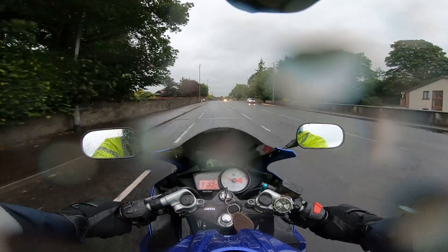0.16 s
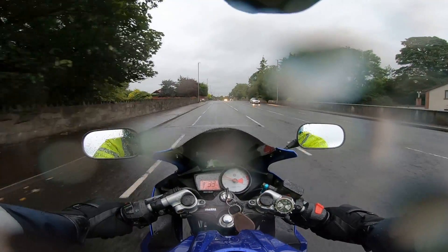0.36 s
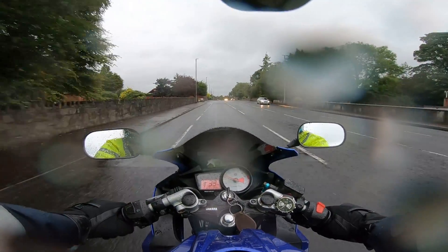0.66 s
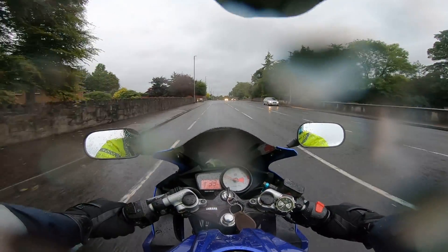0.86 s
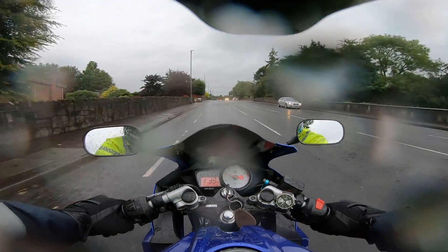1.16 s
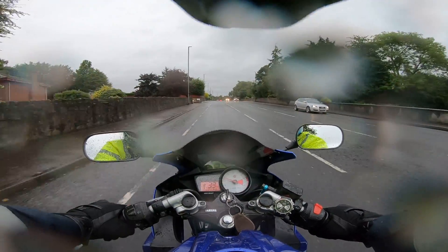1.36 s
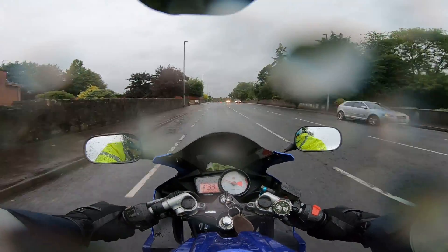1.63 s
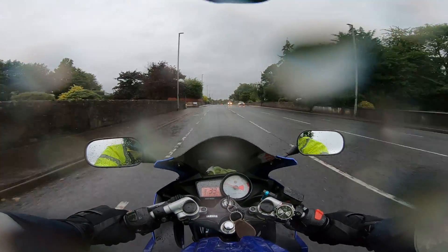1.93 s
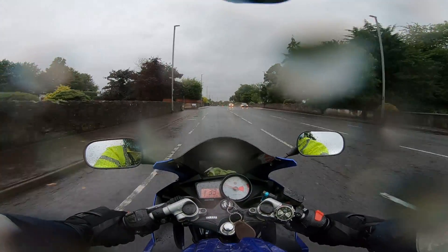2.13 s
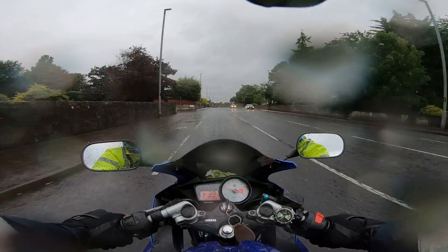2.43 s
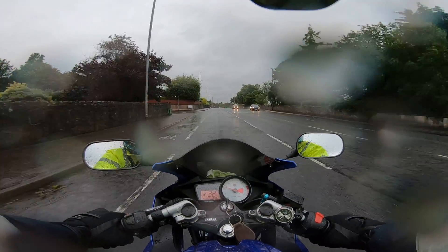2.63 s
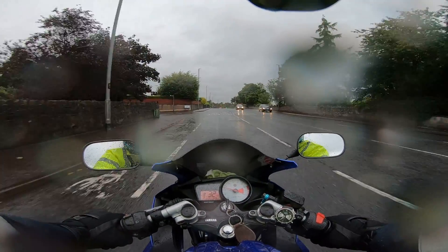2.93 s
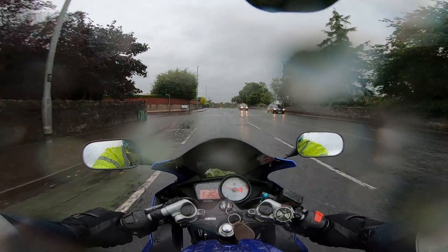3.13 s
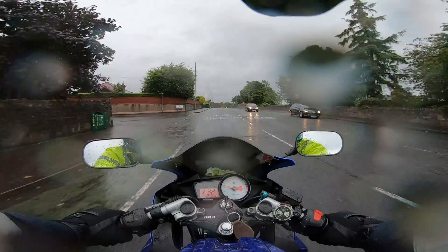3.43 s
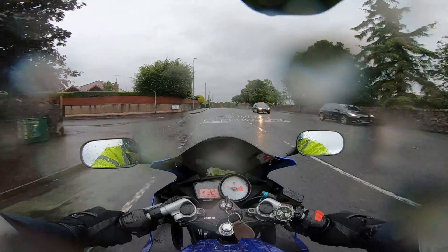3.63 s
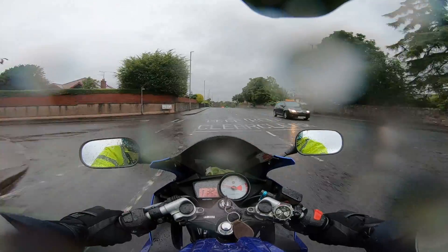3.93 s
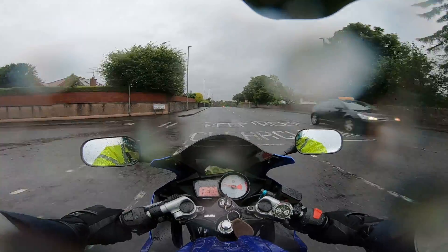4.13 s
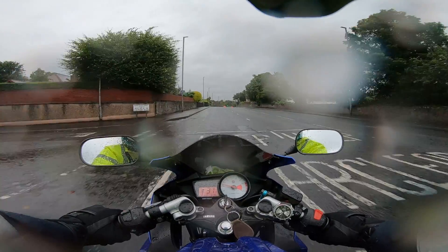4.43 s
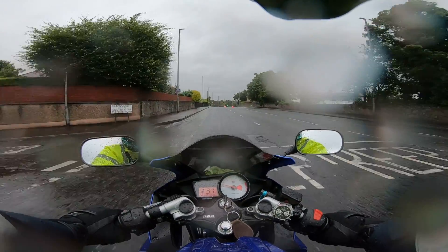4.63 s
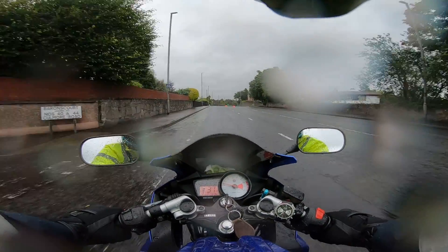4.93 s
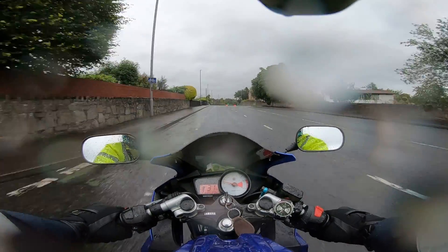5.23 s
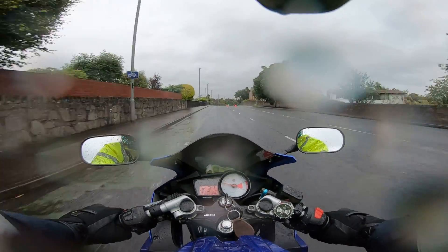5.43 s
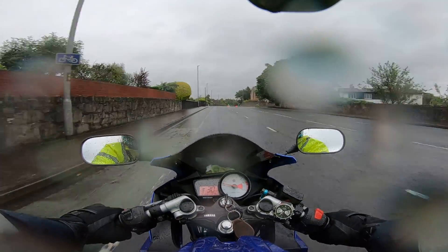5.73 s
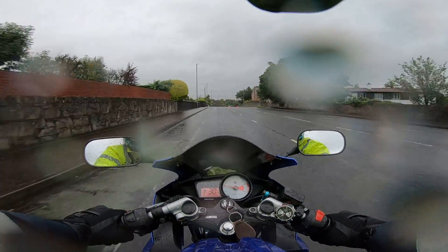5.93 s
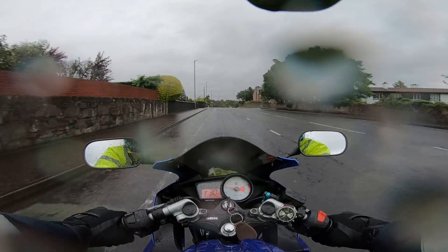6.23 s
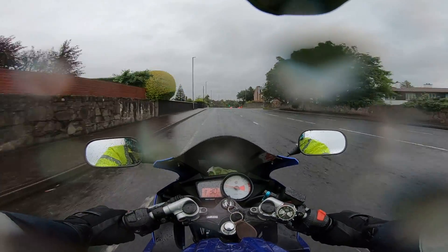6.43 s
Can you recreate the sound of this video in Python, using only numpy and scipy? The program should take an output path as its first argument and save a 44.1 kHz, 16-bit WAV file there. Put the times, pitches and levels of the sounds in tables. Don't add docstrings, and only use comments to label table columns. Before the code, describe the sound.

From the rider's position, buffeting wind nearly buries a steady low engine drone, wet tyre spray, passing car swishes and tiny rain ticks.

```python
import sys
import numpy as np
from scipy import signal
from scipy.fft import rfft, irfft, next_fast_len
from scipy.io import wavfile
from scipy.ndimage import uniform_filter1d, map_coordinates

SR = 44100
rng = np.random.default_rng(int(sys.argv[2]) if len(sys.argv) > 2 else 0)


def undo_db(level):
    steps = np.asarray(level, float) / 20
    return 10 ** steps


def put_to_file(sound):
    columns = np.atleast_2d(sound).T
    safe = np.clip(columns, -1, 1)
    whole_steps = np.round(safe * 32767)
    wavfile.write(sys.argv[1], SR, whole_steps.astype(np.int16))


N = 290178

# [start t/s, length t/s, buffet level/dB, sharp edge over buffet level/dB]
GUSTS = [(0, 0.31, -14, -11.5), (0.289, 0.058, -23, -12), (0.352, 0.12, -17.5, -9),
         (0.465, 0.37, -13.5, -4.5), (0.948, 0.152, -14.5, -2), (1.14, 0.042, -19, -7),
         (1.358, 0.056, -14, -7), (1.465, 0.14, -11.5, -10), (2.071, 0.021, -12.5, 3),
         (2.14, 0.081, -12.5, -13), (2.255, 0.2, -17.5, -5), (2.495, 0.081, -17, -6),
         (2.623, 0.045, -15.5, -19), (2.726, 0.18, -15, -9), (2.98, 0.061, -17.5, -10),
         (3.075, 0.16, -14.5, -4), (3.23, 0.06, -17.5, -6), (3.34, 0.061, -16.5, -20),
         (3.439, 0.072, -16, -6), (3.686, 0.33, -22, -5.5), (3.877, 0.2, -15.5, -3), (4.15, 0.28, -16, -4),
         (4.593, 0.09, -13.5, -16), (4.729, 0.14, -16, -9), (4.938, 0.29, -15, -6.5),
         (5.228, 0.27, -17, -5), (5.505, 0.26, -16, -7.5), (5.735, 0.1385, -17, -3),
         (5.838, 0.4, -19, -8.5), (6.177, 0.58, -24, -3)]
# [f/Hz, level/dB per Hz]
THUMP_COLOUR = [(20, -41.5), (45, -17), (65, 3), (90, 0.5), (130, 3.5), (200, -5.5), (330, -13), (600, -22),
                (1500, -61.5)]
EDGE_COLOUR = [(150, -8.5), (330, 2.5), (600, -6), (1000, -9.5), (2000, -22.5), (5000, -40)]
HEAVE_COLOUR = [(16, -35.5), (27, -8.5), (40, -12.5), (55, -11), (85, -17)]
# [t/s, f/Hz]
CRANK_CYCLE = [
    (0, 37.6),
    (1.9, 37.35),
    (2.7, 36.6),
    (3.5, 35.9),
    (4.7, 35.1),
    (5.5, 34.65),
    (6.58, 34.3),
]
# [multiple of the crank cycle, coasting level/dB rms, pulling level/dB rms]
EXHAUST_ORDERS = [(2, -26, -28.5), (3, -34, -34), (4, -41, -25), (5, -31, -30.5), (6, -42, -31),
                  (7, -44, -30), (8, -49, -44), (10, -40, -43.5), (13, -54.5, -36)]
# [t/s, opening 0-1]
THROTTLE = [
    (0, 0.4),
    (1.3, 0.25),
    (1.8, 0),
    (2.9, 0.3),
    (3.6, 0.14),
    (4.6, 0.15),
    (5.4, 0.53),
    (5.9, 0.7),
    (6.3, 0.93),
    (6.58, 0.88),
]
# [t/s, roar level/dB]
WETNESS = [(0.0, -27.5), (0.16, -34.5), (0.42, -31.5), (0.58, -28), (1.32, -35), (2.0, -31), (2.99, -28.5),
           (3.1, -27), (4.25, -27), (4.8, -29), (5.0, -28.5), (5.1, -26), (5.42, -30.5), (5.54, -31.5),
           (6.12, -29), (6.58, -25)]
# [closest t/s, spray level/dB, gap over closing speed t/s]
CARS = [
    (1.9, -36, 0.22),
    (3.62, -35.5, 0.16),
    (3.88, -34, 0.25),
    (4.3, -40.5, 0.23),
    (5.85, -42, 0.15),
    (6.45, -36, 0.2),
]
# [f/Hz, level/dB per Hz]
ROAR_COLOUR = [(30, -24), (100, 8.5), (300, 3), (550, -1.5), (800, 3), (1150, 2.5), (1400, -2),
               (1700, -29.5), (2500, -47)]
SPRAY_COLOUR = [(820, -39), (1400, 0), (1450, 1.5), (1620, 2), (2000, 1), (2180, 1.5), (3430, -6.5),
                (3860, -18), (4600, -16), (6200, -23.5), (8060, -51), (13600, -120)]
MIST_COLOUR = [(4300, -33), (5000, -5), (5240, 3), (5500, -5.5), (6600, -7.5), (8200, -6.5), (8900, -20),
               (9800, -22), (10400, -22), (11200, -28), (12500, -36), (13700, -40), (14000, -73.5),
               (16000, -73.5)]
# [t/s, peak level/dB]
SLAPS = [(0.02, -11), (0.195, -16.5), (0.242, -19.5), (0.385, -14), (0.406, -18.5), (0.463, -9.5),
         (0.485, -14), (0.579, -9), (0.62, -12.5), (0.64, -10), (0.666, -10), (0.695, -6.5), (0.772, -20),
         (0.966, -8), (1.008, -9), (1.05, -9.5), (1.081, -9), (1.525, -7), (1.54, -6), (2.074, -14),
         (2.141, -10), (2.178, -12.5), (2.257, -10), (2.499, -8), (2.744, -15), (2.816, -20.5),
         (3.069, -13), (3.094, -17), (3.13, -15.5), (3.297, -17.5), (3.506, -15.5), (4.626, -18),
         (4.756, -11.5), (5.038, -6), (5.185, -14), (5.591, -13.5), (5.661, -19), (5.782, -13.5),
         (5.996, -20), (3.356, -14), (3.389, -13.5), (3.756, -14), (3.822, -17), (3.999, -9), (4.046, -9),
         (4.163, -14), (4.82, -11), (4.965, -20), (5.012, -5.5), (5.158, -12), (5.351, -10), (5.392, -9),
         (5.457, -12), (6.341, -12.5), (6.545, -11.5)]
# [f/Hz, level/dB per Hz]
CRACKLE_COLOUR = [(200, -40), (450, -3), (900, -5), (1400, -15), (2300, -22), (5000, -49)]
# [middle t/s, peak level/dB, f/Hz]
SWELLS = [(0.024, -14, 78), (0.114, -12, 89), (0.241, -13.5, 83), (0.295, -7.5, 80), (0.426, -10, 89),
          (0.494, -7.5, 78), (0.593, -10.2, 84), (0.645, -12.2, 92), (0.699, -10, 87), (0.773, -7, 79),
          (0.844, -6.5, 81), (1.013, -7.5, 73), (1.091, -7, 98), (1.522, -13, 79), (1.592, -11, 80),
          (2.083, -9, 93), (2.146, -6, 83.5), (2.19, -7, 84), (2.268, -7.5, 89.5), (2.363, -10.5, 88),
          (2.428, -12.8, 85), (2.57, -8.5, 68), (2.639, -18, 93), (2.819, -17, 81), (2.887, -10, 92),
          (3.02, -13, 81), (3.104, -9, 87), (3.157, -12, 82), (3.203, -12.0, 71), (3.242, -21, 76),
          (3.297, -10, 88), (3.363, -12.5, 80), (3.465, -12.4, 87), (3.76, -12, 82), (3.797, -11.5, 77),
          (3.836, -13.4, 78), (3.976, -10, 80), (4.028, -11.4, 86), (4.215, -11, 95), (4.288, -8, 65),
          (4.393, -8.5, 80), (4.67, -15, 77), (4.763, -8.5, 92), (4.859, -9.5, 80), (4.971, -12, 84),
          (5.043, -5, 81), (5.097, -13, 90), (5.155, -8.5, 79), (5.196, -7, 82), (5.252, -6.5, 79),
          (5.342, -5.5, 96), (5.506, -16, 79.2), (5.559, -8, 72), (5.598, -7, 77), (5.689, -12, 72),
          (5.728, -9, 79), (6.332, -10, 89), (6.455, -11.7, 74)]
# [middle t/s, peak level/dB, f/Hz]
RIPPLES = [(0.037, -6, 164), (0.075, -11, 182), (0.127, -14, 191), (0.169, -11.6, 177), (0.202, -8.6, 177),
           (0.246, -10.0, 178), (0.487, -12, 213), (0.536, -7.3, 169), (0.584, -13.0, 226),
           (0.641, -10, 189), (0.703, -13.6, 225), (0.835, -13, 198), (0.943, -10.5, 192),
           (0.979, -9.0, 193), (1.049, -11.4, 216), (1.094, -9.8, 192), (1.165, -9.6, 173),
           (1.496, -10, 171), (1.53, -13, 164), (1.579, -12.7, 187), (2.091, -9.2, 211),
           (2.165, -10.4, 167), (2.224, -10, 166), (2.359, -12.9, 183), (2.549, -9, 172),
           (2.647, -11.9, 182), (2.74, -13, 168), (2.774, -11.9, 157), (2.867, -13.6, 197),
           (3.075, -13.4, 188), (3.14, -12.3, 178), (3.244, -11.2, 187), (3.392, -14, 179),
           (3.829, -12, 177), (3.913, -12.3, 202), (3.957, -8, 164), (4.0, -10.7, 177), (4.185, -14.5, 176),
           (4.355, -11.9, 172), (4.616, -13, 183), (4.675, -10.7, 205), (4.755, -14, 177),
           (4.819, -9.5, 171), (5.016, -11.7, 199), (5.052, -10.5, 185), (5.127, -8.7, 188),
           (5.267, -13.5, 179), (5.517, -8.5, 175), (5.66, -13, 199), (5.794, -9.6, 209), (5.847, -12, 185),
           (5.878, -12, 174), (6.027, -15, 198), (6.231, -23, 185), (6.29, -14, 172), (6.348, -10.5, 178),
           (6.435, -11, 180), (6.522, -15, 186)]
# [t/s, peak level/dB, f/Hz, push +1 or suck -1]
JOLTS = [(0.0444, -13, 210, 1), (0.2018, -4, 260, 1), (0.2477, -3, 210, -1), (0.4102, -2, 386, 1),
         (0.5352, -1.5, 180, 1), (0.583, -3, 300, -1), (0.6391, -7, 210, 1), (0.7018, -7, 180, -1),
         (0.7332, -4, 312, 1), (0.7797, -7, 340, -1), (0.979, -3, 283, -1), (1.0264, -4, 210, 1),
         (1.0487, -3.5, 280, -1), (1.067, -5.5, 450, 1), (1.0927, -1.5, 212, 1), (1.166, -4.5, 176, 1),
         (1.542, -12, 279, -1), (1.578, -8, 320, -1), (2.091, 1, 236, 1), (2.152, -5, 230, 1),
         (2.1653, -1.5, 180, 1), (2.181, -2.5, 457, 1), (2.36, -10.5, 190, -1), (2.535, -4.5, 225, 1),
         (2.646, -2.5, 173, -1), (2.7744, -2, 152, 1), (2.8684, -5, 230, 1), (3.137, -4, 240, 1),
         (3.246, -6.5, 235, -1), (3.2994, -9, 229, 1), (3.3905, -8, 500, -1), (3.4644, -7, 180, -1),
         (3.51, -3.5, 280, -1), (3.7581, -4.5, 466, -1), (3.9102, -7, 284, -1), (3.935, -6, 230, 1),
         (3.9793, -6, 220, -1), (4.0017, -5, 380, -1), (4.0199, -8.8, 330, 1), (4.2624, -5, 252, 1),
         (4.3536, -9, 220, 1), (4.676, -3, 220, -1), (4.968, -8, 310, 1), (5.014, -8, 550, 1),
         (5.0537, -7, 260, 1), (5.1262, -5, 210, -1), (5.1608, -13, 500, -1), (5.3276, -4.5, 380, 1),
         (5.3536, -7, 362, -1), (5.7928, -2, 220, 1)]
# [t/s, peak level/dB]
COVER_TICKS = [(0.275, -32), (0.816, -42), (1.13, -52), (1.145, -26), (1.6891, -34), (2.4985, -34),
               (3.1874, -20), (3.196, -37), (3.207, -40), (3.222, -42), (3.2717, -37), (4.2415, -25),
               (4.3121, -37), (4.3174, -38), (4.3248, -39), (4.3544, -43), (4.4487, -28), (4.939, -38),
               (5.1218, -43), (6.0252, -26), (6.1165, -39), (6.428, -35), (6.511, -39)]
# [t/s, peak level/dB, f/Hz]
HOUSING_TAPS = [(0.2747, -32, 5000), (0.276, -28.5, 3000), (0.709, -30, 2580), (0.7095, -32, 4300),
                (1.0017, -31, 2950), (1.067, -31.5, 3620), (1.1794, -37, 4800), (1.8604, -28, 2340),
                (3.3263, -31.5, 3800), (3.3266, -31, 4250), (3.327, -31, 4700), (4.2947, -35, 3480),
                (4.875, -30.5, 4300), (5.194, -29, 1900)]
# [f/Hz, level/dB per Hz]
COVER_COLOUR = [(3000, -38), (5000, -9.5), (6000, 0.5), (8000, 4.5), (9800, -9.5), (10800, -36),
                (16000, -42)]
HOUSING_COLOUR = [(600, -29), (1200, 15.5), (6000, 1), (11000, -11), (14000, -40)]

JOLT_HUSH_S = .006


def unit(x):
    return x / np.sqrt(np.mean(x ** 2) + 1e-20)


def curves(rows):
    s, *cols = np.transpose(rows)
    return [np.interp(np.arange(N) / SR, s, c) for c in cols]


def wobble(rate):
    coarse = np.arange(0, N + 64, 64)
    knots = rng.standard_normal(int(N * 80 / SR) + 6)
    drift = map_coordinates(knots, [coarse * min(rate, 80) / SR])
    return np.interp(np.arange(N), coarse, drift)


def coloured(x, spectrum):
    m = next_fast_len(N + 8192)
    hz, db = np.transpose(spectrum)
    grid = np.log(np.fft.rfftfreq(m, 1 / SR) + 1)
    gain = undo_db(np.interp(grid, np.log(hz + 1), db, -120, -120))
    return irfft(rfft(x, m) * gain, m)[:N]


def rush(spectrum, patchy_db):
    z = signal.stft(rng.standard_normal(N), nperseg=512)[2]
    field = uniform_filter1d(rng.standard_normal(z.shape), size=6, axis=0)
    field = uniform_filter1d(field, size=8, axis=1)
    noise = signal.istft(z * undo_db(patchy_db * unit(field)), nperseg=512)[1][:N]
    return unit(coloured(noise, spectrum))


def eddies(share, spread_db):
    draw = rng.random((3, N))
    size = undo_db(-spread_db * np.log(draw[2] + 0.0015))
    return (draw[0] < share) * np.sign(draw[1] - .5) * size


def dip(events, share, span_s):
    marks = np.zeros(N)
    marks[[round(row[0] * SR) for row in events]] = 1
    around = signal.fftconvolve(marks, np.hanning(round(4 * span_s * SR)), "same")
    return 1 - share * np.clip(around, 0, 1)


def gusts():
    rise_s, fall_s, edge_rise_s = 0.017, 0.011, .03
    t = np.arange(N) / SR
    buffet, edge = np.full(N, undo_db(-25.5)), np.full(N, undo_db(-31))
    for s, length, db, edge_db in GUSTS:
        shape = np.interp(t, [s - rise_s, s, s + length, s + length + fall_s], [0, 1, 1, 0])
        late = np.clip((t - s) / min(edge_rise_s, length / 2), 0, 1)
        buffet = np.maximum(buffet, undo_db(db) * shape)
        edge = np.maximum(edge, undo_db(db + edge_db) * shape * late)
    return 20 * np.log10(buffet), 20 * np.log10(edge)


def wind():
    buffet_db, edge_db = gusts()
    flurry = wobble(28)
    kicks = eddies(share=.006, spread_db=1.0)
    thump = unit(undo_db(1.1 * flurry) * unit(coloured(kicks, THUMP_COLOUR)))
    thump = thump * dip(SWELLS, share=.5, span_s=.012)
    grit = unit(coloured(kicks, EDGE_COLOUR)) + 1.1 * rush(EDGE_COLOUR, patchy_db=6.5)
    edge = unit(undo_db(0.38 * flurry + 3.0 * wobble(75)) * grit)
    slow_db = uniform_filter1d(buffet_db, size=round(0.086 * SR))
    heave_db = -25 + 0.69 * (slow_db - slow_db.mean()) + 1.9 * wobble(4.1)
    heave = undo_db(heave_db) * rush(HEAVE_COLOUR, patchy_db=0.9)
    flow = undo_db(buffet_db - 4) * thump + undo_db(edge_db - 5.5) * edge + heave
    return dip(JOLTS, share=.6, span_s=JOLT_HUSH_S) * flow


def engine():
    firing_s = 6.2005
    turn = 2 * np.pi * np.cumsum(curves(CRANK_CYCLE)[0] * (1 + 0.002 * wobble(6))) / SR
    turn = turn - turn[round(firing_s * SR)]
    throttle = np.clip(curves(THROTTLE)[0], 0, 1)
    note = np.zeros(N)
    for k, coast_db, pull_db in EXHAUST_ORDERS:
        uneven_db = 2.1 * wobble(6)
        drift = .6 * wobble(6)
        level_db = coast_db + throttle * (pull_db - coast_db) + uneven_db
        note -= np.sqrt(2) * undo_db(level_db) * np.cos(round(k) * turn + drift)
    clatter = rush([(1500, -17.5), (3000, -5.0), (5200, -8.5), (9000, -26.5)], patchy_db=-0.8)
    return note + undo_db(-48.0 + 0.81 * np.sin(2 * turn)) * clatter


def hedge():
    t, end_s = np.arange(N) / SR, 0.33
    level_db = -47 - 28 * t - 110 * np.maximum(t - end_s, 0)
    colour = [(4500, -23), (5800, -1.0), (8000, -3.5), (9300, -9), (9900, -24), (11200, -30),
              (13000, -39), (15000, -51)]
    return undo_db(level_db) * rush(colour, patchy_db=3)


def road():
    t, roar_db = np.arange(N) / SR, curves(WETNESS)[0]
    wet_db = roar_db - roar_db.mean()
    cars = sum(undo_db(db) ** 2 / (1 + ((t - s) / near_s) ** 2) for s, db, near_s in CARS)
    spray_gain = np.sqrt(undo_db(-36 + 0.29 * wet_db) ** 2 + cars)
    mist_gain = np.sqrt(undo_db(-76 + .3 * wet_db) ** 2 + undo_db(-45) ** 2 * cars)
    shared = wobble(12)
    roar = undo_db(roar_db + 2.5 + 0.52 * shared) * rush(ROAR_COLOUR, patchy_db=1.2)
    spray = spray_gain * undo_db(-1.7 + 0.5 * shared) * rush(SPRAY_COLOUR, patchy_db=1.0)
    droplets = eddies(share=.006, spread_db=2.2)
    mist = rush(MIST_COLOUR, patchy_db=1.5) + 0.5 * unit(coloured(droplets, MIST_COLOUR))
    mist = mist_gain * undo_db(22.5 + 0.27 * shared + .6 * wobble(7)) * mist
    return roar + spray + mist


def shed():
    gap_s, scatter, swing_hz, swing_spread = .036, .45, 129, .25
    merge_s = .014
    rows, large = [], np.array([row[0] for row in list(SLAPS) + list(JOLTS)])
    for s, length, db, _ in GUSTS:
        draw = rng.standard_normal((16, 4))
        gaps = gap_s * np.exp(scatter * draw[:, 0])
        after = np.cumsum(gaps) - gaps[0]
        level_db = db - 6 + 1.5 * draw[:, 1]
        hz = swing_hz * np.exp(swing_spread * draw[:, 2])
        table = np.c_[s + after, level_db, hz, np.sign(draw[:, 3])]
        alone = np.abs(table[:, :1] - large).min(axis=1) > merge_s
        inside = (after < length - .02) & (s + after < N / SR - .01)
        rows += list(table[alone & inside])
    return rows


def slaps():
    gate, snap, swing = np.zeros(N + 5000), np.zeros(N), np.zeros(N + 5000)
    t = np.arange(3500) / SR
    swings, crackle = shed(), rush(CRACKLE_COLOUR, patchy_db=2.5)
    strong = [(s - .003, db - 13, 101, rng.choice([-1, 1])) for s, db in SLAPS]
    ordinary = [(s, db - 7.5) for s, db, _, _ in swings]
    for s, db in list(SLAPS) + ordinary:
        gate[round(s * SR):][:len(t)] += undo_db(db - 9.0 - 60 * t / 0.056) * (1 - np.exp(-t / 0.002))
        snap[round((s + .0025) * SR)] = undo_db(db + 28) * rng.choice([-1, 1])
    for s, db, hz, sign in swings + strong:
        shape = undo_db(db + 4.5 - 60 * t / 0.071) * (1 - np.exp(-t / 0.0046))
        swing[round(s * SR):][:len(t)] += sign * shape * np.sin(2 * np.pi * hz * t)
    return gate[:N] * crackle + coloured(snap, CRACKLE_COLOUR) + swing[:N]


def swells():
    out, t = np.zeros(N + 4000), np.arange(-2000, 2000) / SR
    jolt_s = np.array([row[0] for row in JOLTS])
    deep = [(s, db, hz, 0.57) for s, db, hz in SWELLS]
    quick = [(s, db, hz, 0.6) for s, db, hz in RIPPLES if np.abs(jolt_s - s).min() > JOLT_HUSH_S]
    for s, db, hz, cycles in deep + quick:
        bell = np.exp(-.5 * (hz * t / cycles) ** 2)
        sway = np.cos(2 * np.pi * (hz * t + rng.random()))
        out[round(s * SR):][:len(t)] += undo_db(db - 1.5) * bell * sway
    return out[2000:][:N]


def jolts():
    out, t = np.zeros(N + 800), np.arange(-400, 400) / SR
    for s, db, hz, sign in JOLTS:
        u = (np.pi * 0.82 * hz * t) ** 2
        out[round(s * SR):][:len(t)] += np.sign(sign) * undo_db(db - 3.5) * (1 - 2 * u) * np.exp(-u)
    return out[400:][:N]


def rain():
    clicks, taps, t = np.zeros(N), np.zeros(N + 400), np.arange(400) / SR
    for s, db in COVER_TICKS:
        clicks[round((s + .0012) * SR)] = undo_db(db + 15.5)
    for s, db, hz in HOUSING_TAPS:
        shape = undo_db(db + 15.5 - 60 * t / 0.0019) * (1 - np.exp(-t / 0.00022))
        taps[round((s + .0006) * SR):][:len(t)] += shape * np.sin(2 * np.pi * hz * t)
    return coloured(clicks, COVER_COLOUR) + coloured(taps[:N], HOUSING_COLOUR)


def squeak():
    start_s, length_s, low_hz, rise = 1.167, .016, 650, 3.2
    u = np.clip((np.arange(N) / SR - start_s) / length_s, 0, 1)
    turn = 2 * np.pi * np.cumsum(low_hz * rise ** u) / SR
    return undo_db(-23) * np.sin(np.pi * u) * np.sin(turn)


def scene():
    duck_db = -.25 * np.clip(uniform_filter1d(gusts()[0], size=2000) + 14.8, 0, 20)
    air = wind() + slaps() + swells() + jolts()
    ride = undo_db(duck_db) * engine() + road() + hedge()
    return (air + ride + rain() + squeak())[None]


def roll_off(x):
    return signal.sosfilt(signal.butter(12, 15600, fs=SR, output="sos"), x)


def record(dry):
    soft = dry / (1 + np.abs(dry / .82) ** 4) ** (1 / 4)
    return roll_off(soft)


dry = scene()
out = record(dry)
put_to_file(out)
```